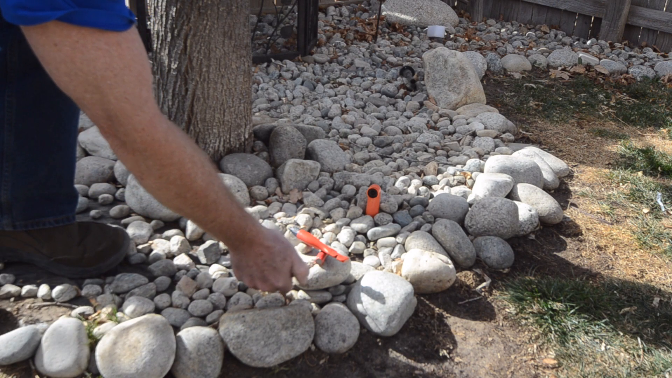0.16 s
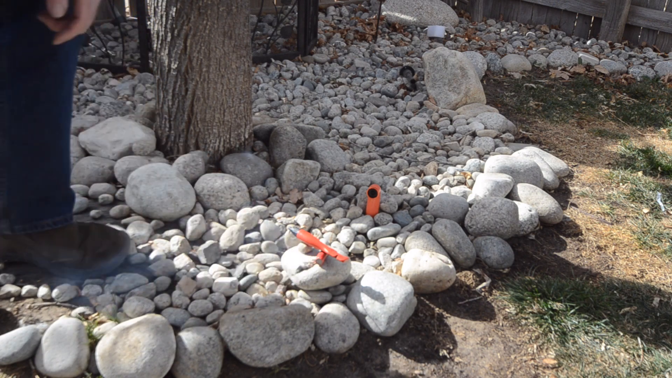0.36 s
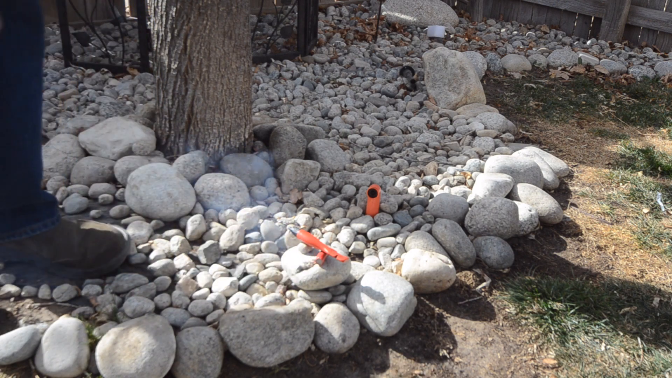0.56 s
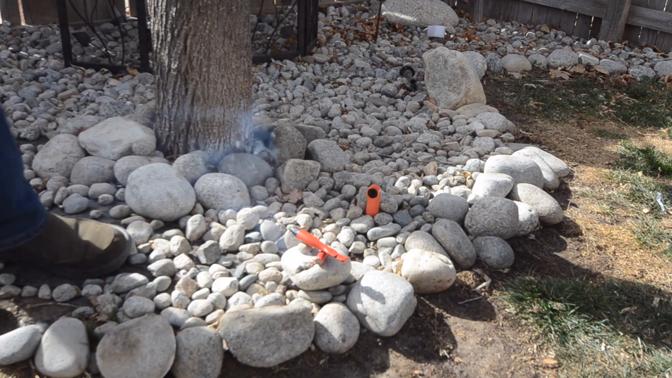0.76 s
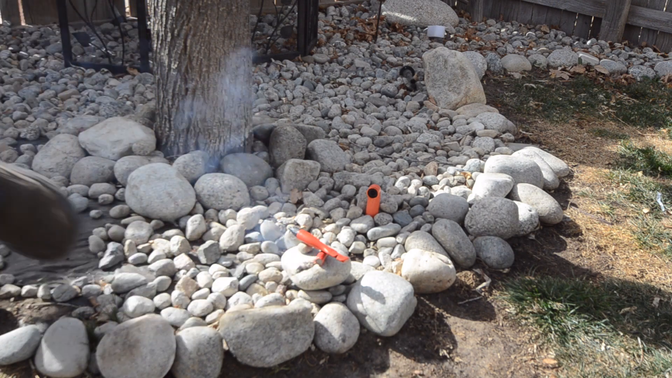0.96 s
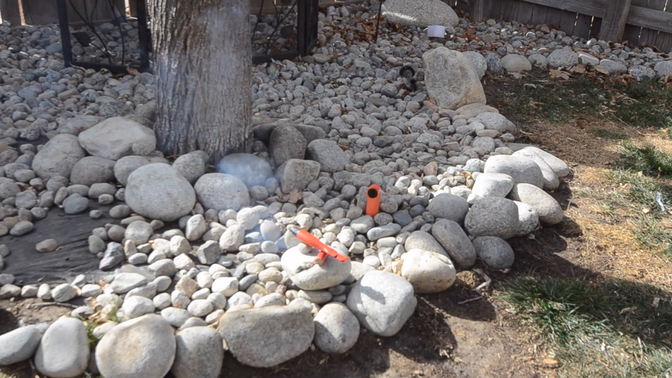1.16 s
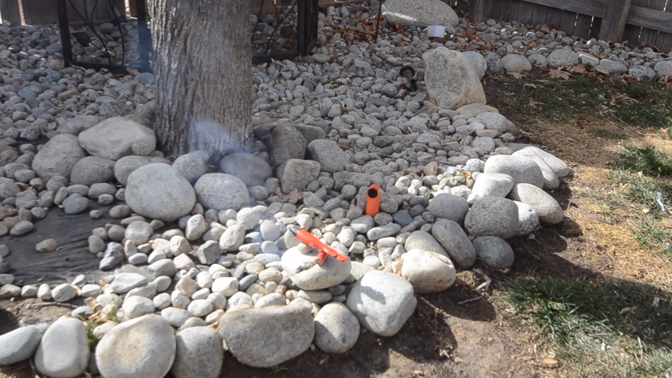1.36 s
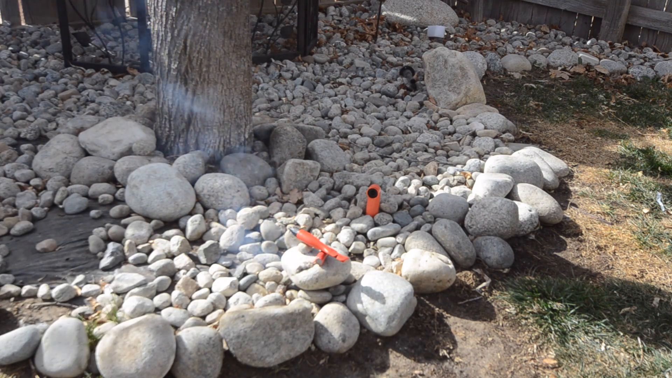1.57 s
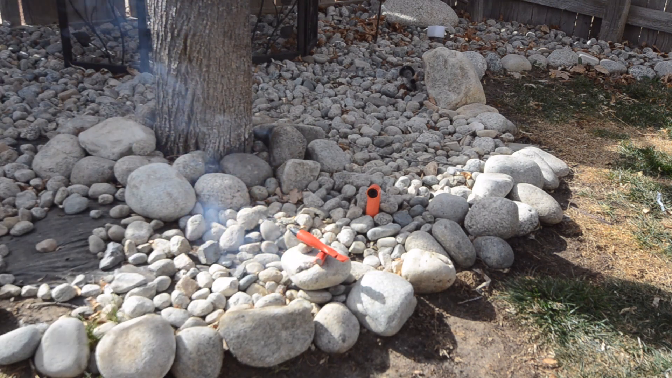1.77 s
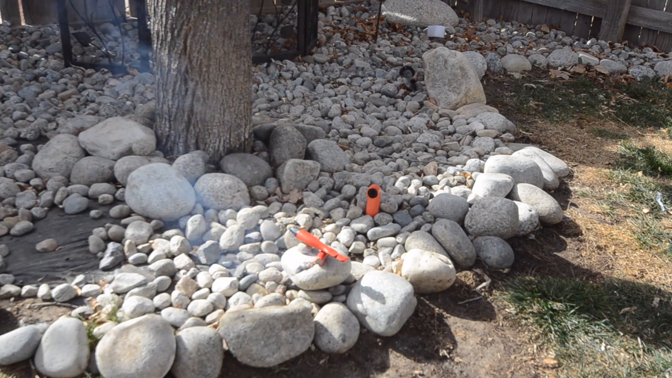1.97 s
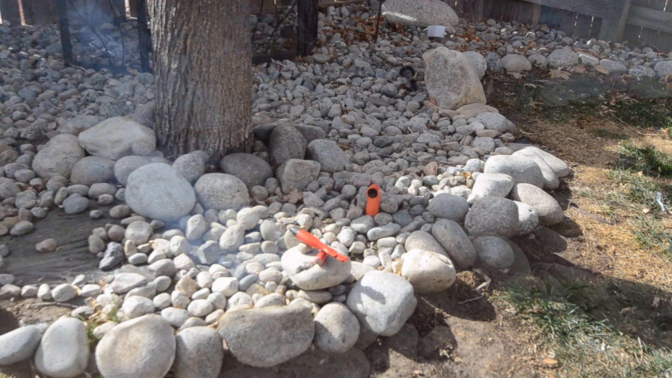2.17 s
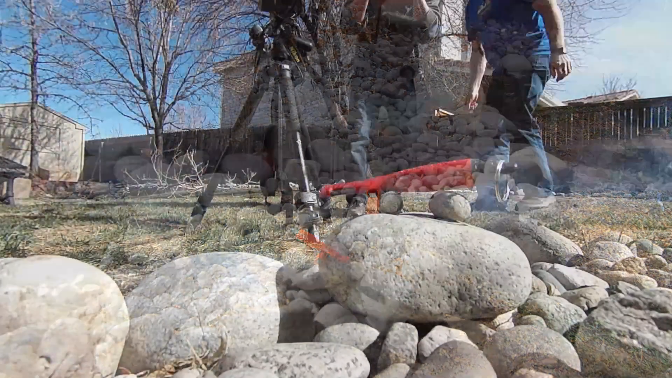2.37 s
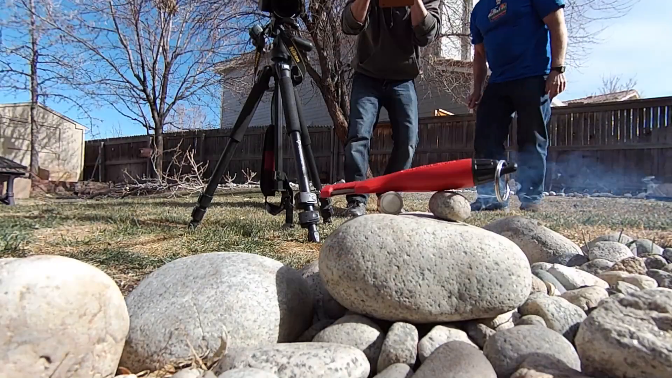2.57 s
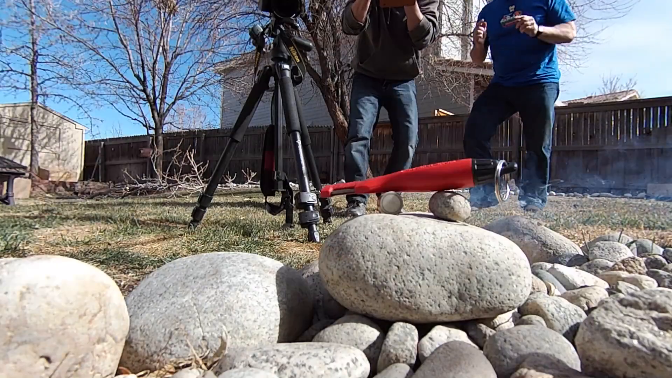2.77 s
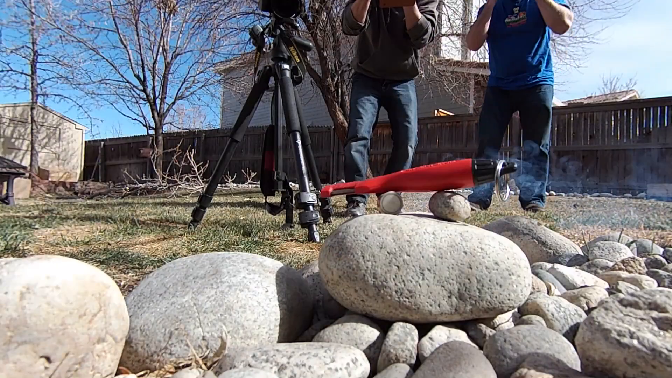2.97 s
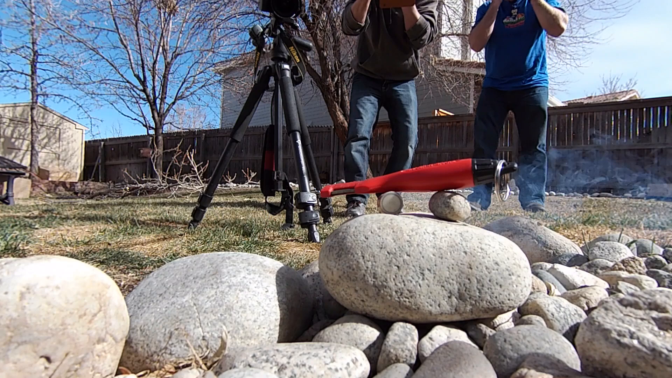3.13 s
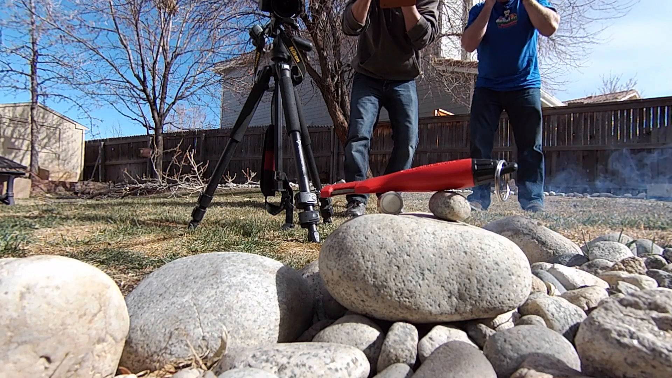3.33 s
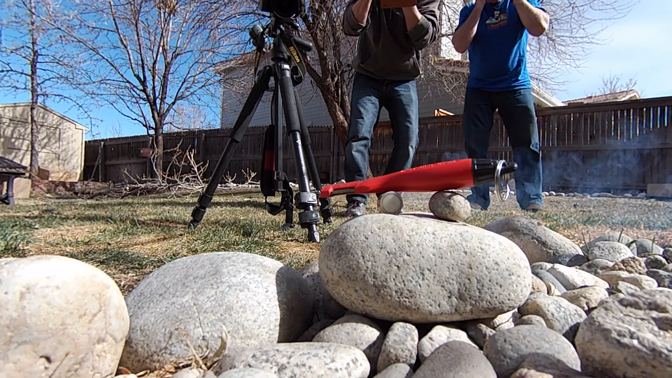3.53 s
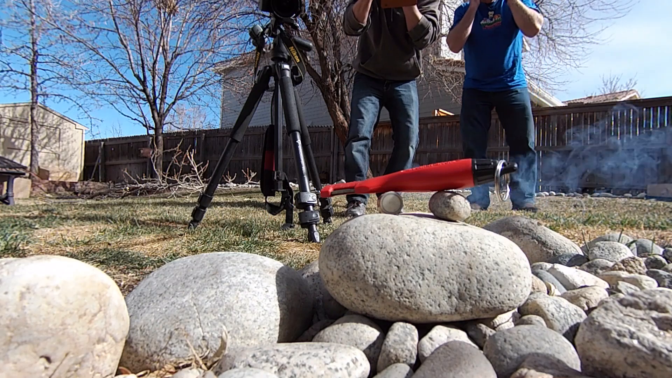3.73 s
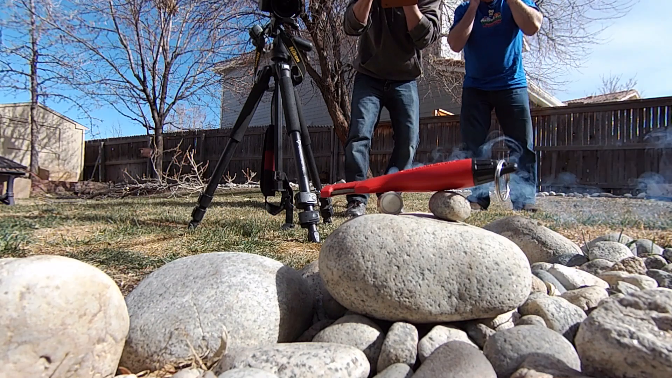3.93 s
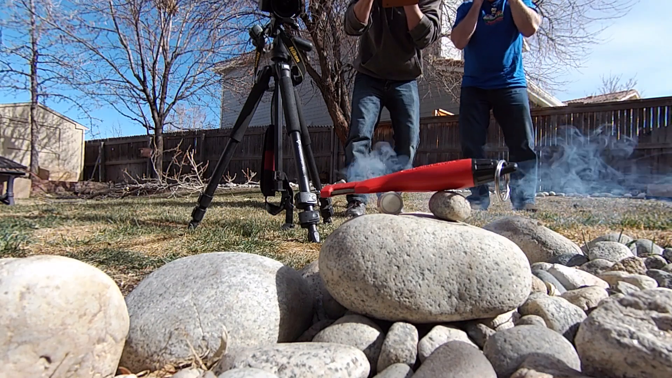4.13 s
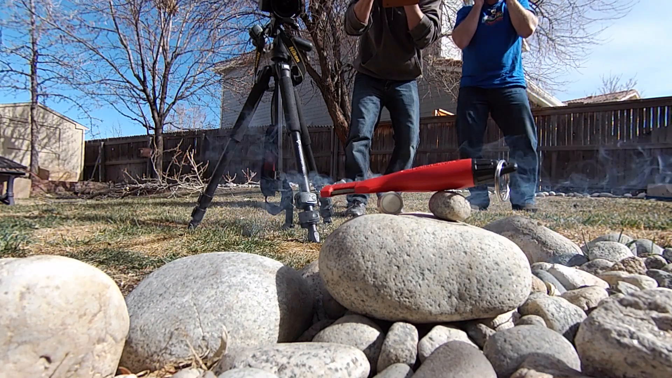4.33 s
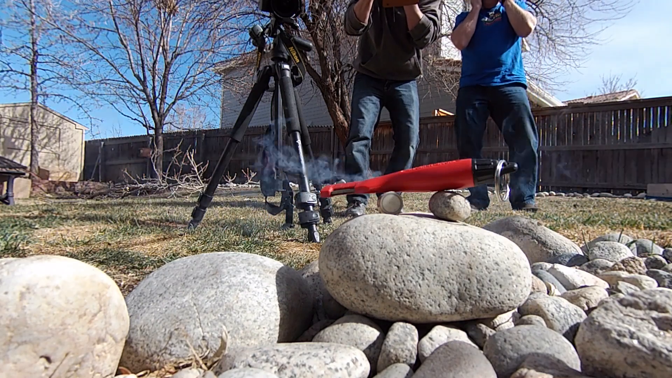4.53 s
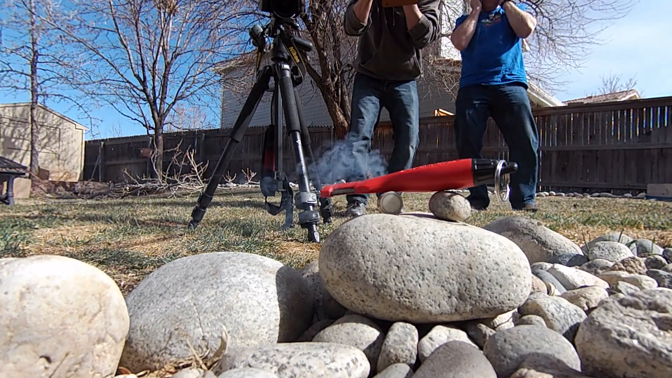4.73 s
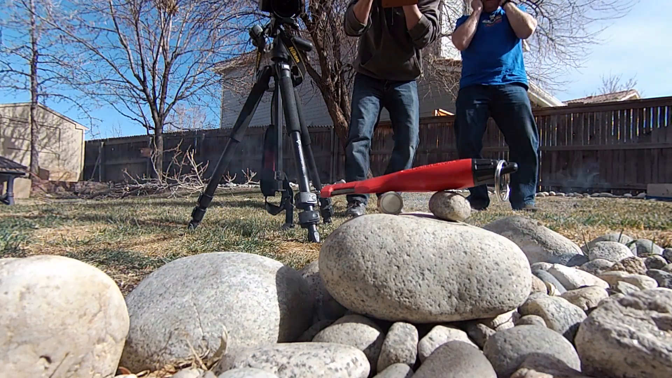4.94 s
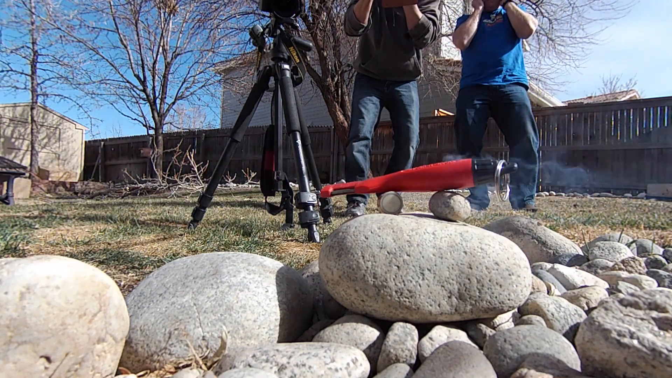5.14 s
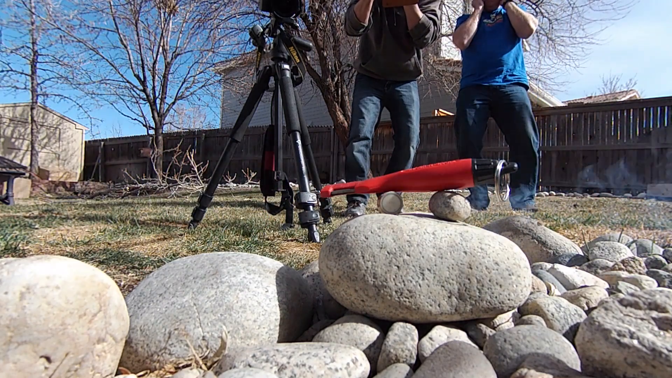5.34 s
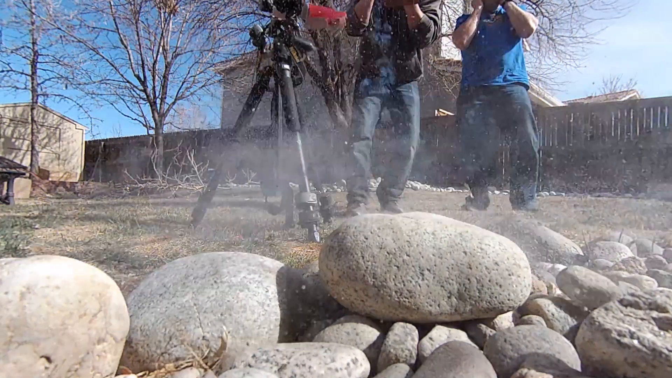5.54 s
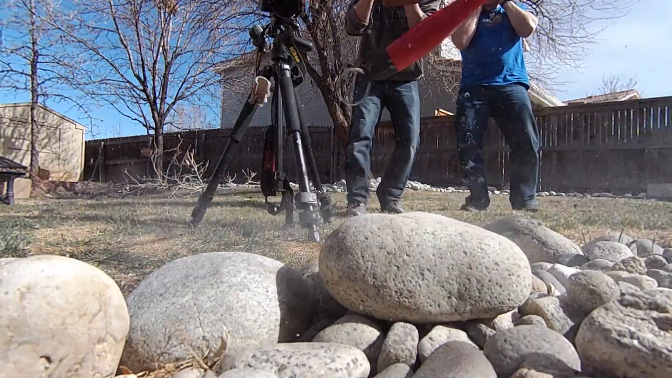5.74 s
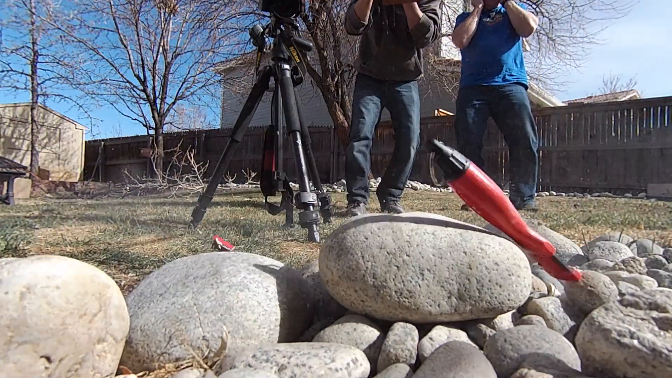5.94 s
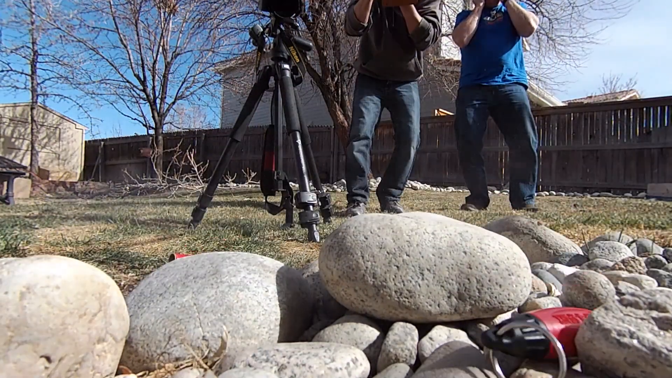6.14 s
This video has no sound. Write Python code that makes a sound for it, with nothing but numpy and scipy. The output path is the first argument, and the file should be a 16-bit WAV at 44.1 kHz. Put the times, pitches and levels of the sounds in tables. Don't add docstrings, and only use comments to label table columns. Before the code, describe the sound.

From the start a lit fuse hisses close to the microphone in an open garden, loudest at first, then settling within half a second into a steady, airy, fluttering jet over faint wind rumble. Tiny spits and pebble ticks dot it around 1 to 1.6 seconds, with a sharper pop at 2.0. It flares brighter near 2.8, then from 3.1 creeps into a plastic tube; by 3.75 the top is gone and the hiss is nasal, with sizzling puffs from 4 onward. Low wind thumps multiply after 4.1. At about 5.0 everything abruptly drops quieter. At 5.42 a huge bang overloads the microphone, with dense roaring reflections collapsing by 5.55 into dull yard echo. A faint rising whoosh follows near 5.7, then scraps click and crunch on stones from 5.73, strongest at 5.83 and 6.11, with hollow plastic knocks, ending in faint murmur and wind.

```python
import sys
import numpy as np
from scipy import signal
from scipy.io import wavfile

SR = 44100
rng = np.random.default_rng(int(sys.argv[2]) if len(sys.argv) > 2 else 0)


def gain_from_db(level_db):
    decades = np.asarray(level_db, float) / 20
    return 10 ** decades


def output_pcm(signal):
    pcm = np.clip(np.atleast_2d(signal).T, -1, 1) * 32767
    wavfile.write(sys.argv[1], SR, np.round(pcm).astype(np.int16))


N = 277830
STEP = 40
SHOCK_S = 5.4242


def clock():
    return np.arange(N) / SR


def rms_one(x):
    return x / np.sqrt(np.mean(x ** 2) + 1e-20)


def band_pass(x, low_hz, high_hz):
    return signal.sosfilt(signal.butter(2, [low_hz, high_hz], "band", fs=SR, output="sos"), x)


def in_time(rows):
    s, *columns = np.transpose(rows)
    return [np.interp(clock(), s, c) for c in columns]


def at_hz(points, hz):
    points = np.array(points)
    return np.interp(np.log(hz), np.log(points[:, 0]), points[:, 1])


def spread(slow):
    return np.interp(np.arange(N) / STEP, np.arange(len(slow)), slow)


def slow_drift(rate_hz):
    r = np.exp(-2 * STEP * np.pi * rate_hz / SR)
    settle = 2000
    chance = rng.standard_normal(N // STEP + settle + 2)
    smooth = signal.lfilter([1], [1, -2 * r, r * r], chance)
    return rms_one(smooth[settle:])[:-(-N // STEP)]


def drift(rate_hz):
    return spread(slow_drift(rate_hz))


def ring(clicks, hz, t60):
    r, w = gain_from_db(-60 / (t60 * SR)), 2 * np.pi * hz / SR
    return signal.lfilter([0, np.sin(w)], [1, -2 * r * np.cos(w), r * r], clicks + 1e-18)


def cut(x, hz, width_hz, db):
    w, a, g = 2 * np.pi * hz / SR, np.tan(np.pi * width_hz / SR), gain_from_db(db / 2)
    zeros = [1 + a * g, -2 * np.cos(w), 1 - a * g]
    poles = [1 + a / g, -2 * np.cos(w), 1 - a / g]
    return signal.lfilter(zeros, poles, x)


def flatten(x, top, knee):
    return x / (1 + np.abs(x / top) ** knee) ** (1 / knee)


def blended_noise(first, second, share, span, flicker_db, tilt_db=0, flutter_db=0, count=3):
    edges = np.geomspace(*span, round(count * np.log2(span[1] / span[0])) + 1)
    white, out, power = rng.standard_normal((2, N)), 0, 0
    share, tilt_db, flutter_db = [(v + np.zeros(N))[::STEP] for v in (share, tilt_db, flutter_db)]
    for k, (low, high) in enumerate(zip(edges, edges[1:])):
        hz = np.sqrt(low * high)
        band = band_pass(white[k % 2], low, high)
        colour_db = (1.5 - share) * at_hz(first, hz) + share * at_hz(second, hz)
        gain = gain_from_db(colour_db + tilt_db * np.log2(max(hz, 2800.) / 2800.))
        power = power + gain ** 2 * (high - low)
        grip = np.clip(np.log2(hz / 700) / 3, 0, 1)
        out = out + band * spread(gain * gain_from_db(flicker_db * slow_drift(24) + flutter_db * grip))
    return out / spread(np.sqrt(power * 3.08 / SR))


def gain_step_db():
    return -11.5 * (clock() > 4.984)


# time in seconds, hiss in dB, heat of the flame in dB.
BURN = [(0.0, -26, -4), (0.05, -26.5, -6.5), (0.25, -32.5, -0.5), (0.48, -34, -2.5), (2.0, -34, -0.5),
        (2.6, -34, 0.5), (2.83, -32.5, 3.5), (3.12, -34.5, -4.5), (3.38, -35, -3), (3.7, -36.8, -6),
        (3.73, -36.5, -14), (3.81, -33.5, -12), (4.02, -32.5, -10.5), (4.45, -36, -10.5), (4.83, -34, -5),
        (5.05, -34.5, -6), (5.33, -33.5, -2)]
# centre in seconds, strength in dB, half length in seconds.
PUFFS = [(3.98, 3, .03), (4.15, 11, .09), (4.26, 8, .045), (4.38, 10.5, .07), (4.655, 9.5, .19),
         (4.96, 9, .11), (5.152, 12, .012), (5.284, 7, .07), (5.39, 10.5, .06)]
SHADOW_S = 3.74


def flame(inside):
    t, (hiss_db, heat_db) = clock(), in_time(BURN)
    puff_db = sum(db * np.clip(1 - np.abs(t - s) / half_s, 0, 1) for s, db, half_s in PUFFS)
    open_db, hidden_db = -8.5 - 11 * inside, -28.5
    gone = np.clip((t - SHADOW_S + .04) / .12, 0, 1)
    sizzle_db = (1 - gone) * open_db + gone * hidden_db + puff_db
    return hiss_db + .25 * puff_db + gain_step_db(), heat_db + .55 * puff_db, sizzle_db


# time in seconds, share from 0 to 1.
INSIDE = [(0, 0.07), (2.9, 0.01), (3.3, 0.42), (3.7, .7), (4.0, 0.66), (5.4, 1)]
# frequency in Hz, level in dB per Hz.
OPEN_JET = [(88, -31), (150, -2), (729, -2), (1170, 0), (1790, -5), (2290, -3.5), (3740, -7.5), (4080, -6),
            (4780, -7), (6560, -3), (10000, -5.5), (13000, -37), (22000, -120)]
TUBE_JET = [(180, -38), (300, -29.5), (396, -17.5), (1190, -10), (1420, -4.5), (1670, -25.5), (2170, -1),
            (2710, 4), (3630, -4), (6530, -4.5), (10000, -17.5), (13000, -50), (22000, -120)]
# frequency in Hz, level in dB per Hz.
OPEN_SIZZLE = [(9500, -1), (11300, -2), (13200, -7.5), (16000, -11)]
TUBE_SIZZLE = [(9500, 12), (11300, -4), (13200, -13), (16000, -25.5)]
# frequency in Hz, width in Hz, depth in dB.
GROUND = [(3100, 123, -12), (3703, 86, -14.5), (4740, 490, -4.5), (7150, 150, -8), (9670, 250, -6),
          (10170, 690, -7), (14000, 260, 4.5)]
# frequency in Hz, width in Hz, depth in dB.
FIRST_DIP = (1900, 370, -18)
LAST_DIP = (1624, 510, -15.5)
# time in seconds, delay in ms, level in dB.
HAND = [(0, .15, -13), (.1, .165, -9), (.2, .33, -9), (.28, .45, -17), (.4, .6, -40), (.5, .6, -60)]


def fuse():
    inside = in_time(INSIDE)[0]
    hiss_db, heat_db, sizzle_db = flame(inside)
    hidden = np.clip((clock() - SHADOW_S) / .3, 0, 1)
    hidden = hidden - 0.33 * inside * (1 - hidden)
    spits = (rng.random(N) < 70 / SR) * rng.random(N)
    spit_db = 3 * signal.lfilter([1], [1, -gain_from_db(-60 / (.04 * SR))], spits)
    flutter_db = spit_db + .8 * drift(25) + 1.3 * drift(140) + 1.1 * inside * drift(18)
    tilt_db = 0.68 * (heat_db + 1.5 + 1.2 * inside)
    jet = blended_noise(OPEN_JET, TUBE_JET, inside, (130, 9500), 0.83, tilt_db, flutter_db)
    sizzle = blended_noise(OPEN_SIZZLE, TUBE_SIZZLE, hidden, (9500, 16500), .8, 0, flutter_db, count=8)
    jet = jet + gain_from_db(sizzle_db + 2.0) * sizzle
    for hz, width_hz, db in GROUND:
        jet = cut(jet, hz, width_hz, db)
    travel = np.sqrt(np.arange(N) / N)
    jet = (1 - travel) * cut(jet, *FIRST_DIP) + travel * cut(jet, *LAST_DIP)
    delay_ms, hand_db = in_time(HAND)
    jet = jet + gain_from_db(hand_db) * np.interp(np.arange(N) - delay_ms * SR / 1000, np.arange(N), jet)
    return jet * gain_from_db(hiss_db + 2.27) * (clock() < SHOCK_S)


# time in seconds, rumble in dB.
WIND = [(0.0, -41), (0.47, -38), (1.2, -42.5), (3.37, -40), (3.9, -41), (4.26, -37), (4.74, -35),
        (4.84, -40), (4.98, -28), (4.995, -41), (5.2, -29), (5.34, -34), (5.39, -23), (5.56, -44),
        (5.676, -37), (5.78, -44), (6.3, -36)]
# frequency in Hz, level in dB per Hz.
RUMBLE = [(12, -44), (20, -19.5), (34, -3.5), (59, -0.5), (109, -1.5), (147, -7), (300, -9.5), (390, -59.5),
          (660, -120)]
YARD = [(12, -41), (20, -10), (107, -8.5), (182, -6), (220, -22), (615, -29), (1200, -58), (1560, -88),
        (2640, -120)]
# start in seconds, peak in dB, frequency in Hz, t60 in seconds.
BUFFETS = [(4.108, -24.5, 51.1, 0.037), (4.331, -18, 91.5, 0.077), (4.405, -29, 111, 0.074),
           (4.429, -20, 61.9, 0.049), (4.51, -25, 56.5, 0.11), (4.541, -25.5, 51.1, 0.078),
           (4.648, -15.5, 96, 0.03), (4.808, -25, 88.8, 0.055), (4.859, -29.5, 137, 0.13),
           (4.932, -24, 76, 0.09), (4.959, -22.5, 95.5, 0.14), (5.11, -31.5, 62.5, 0.17),
           (5.178, -38, 156, 0.095), (5.198, -29, 86.1, 0.11), (5.237, -19.5, 80.7, 0.037),
           (5.318, -28, 142, 0.087), (5.337, -21, 95, 0.051), (5.396, -25.5, 159, 0.06),
           (5.404, -20, 51.1, 0.1), (6.021, -36, 51.7, 0.065), (6.053, -20.5, 91, 0.02),
           (6.196, -35, 70.0, 0.06), (6.253, -29, 110, 0.051), (6.275, -42, 64.6, 0.049)]


def wind():
    after = clock() > SHOCK_S
    rumble = blended_noise(RUMBLE, YARD, after, (18, 1300), 1.7, count=2)
    rumble = rumble * gain_from_db(in_time(WIND)[0] + gain_step_db() - 1.5)
    t = np.arange(round(.12 * SR)) / SR
    for s, peak_db, hz, t60 in BUFFETS:
        i = round(s * SR)
        turns = hz * (t + 0.0023 * (1 - np.exp(-t / 0.0051)))
        fade = gain_from_db(peak_db + 3 - 60 * t / max(t60, .01)) * (1 - np.exp(-t / .001))
        thump = np.sin(2 * np.pi * turns) * fade
        rumble[i:i + len(t)] += thump[:N - i]
    return rumble


def self_noise():
    return gain_from_db(-79) * rms_one(band_pass(rng.standard_normal(N), 9000, 12500))


# time in seconds, peak in dB.
SPARKS = [(1.0182, -21), (1.4068, -22), (1.4916, -21), (1.5789, -22), (2.001, -11.5), (2.6914, -24),
          (2.9473, -16), (3.0356, -17), (3.4557, -17), (3.9201, -30), (3.972, -25), (4.5611, -27),
          (4.6115, -20), (5.3863, -22)]


def sparks():
    clicks = np.zeros(N)
    clicks[[round(s * SR) for s, db in SPARKS]] = gain_from_db(np.array(SPARKS)[:, 1] - 0.5)
    return band_pass(clicks + 1e-18, 4000, 11000)


# time in seconds, peak in dB, frequency in Hz.
POPS = [
    (1.166, -39, 1780),
    (1.402, -35, 4150),
    (1.578, -39, 4600),
]


def pops():
    return sum(ring(gain_from_db(db) * (np.arange(N) == round(s * SR)), hz, .03) for s, db, hz in POPS)


def blast_level(t):
    flare_s = 5.4045
    flare = gain_from_db(-30 + 380 * (np.minimum(t, SHOCK_S) - flare_s) - 12 * (t < flare_s))
    crest_s = 5.455
    crest = gain_from_db(2.5 - 9000 * np.where(t < crest_s, .4, 1) * (t - crest_s) ** 2)
    near = gain_from_db(-24.5 - 2100 * (t - 5.5) ** 2)
    far = gain_from_db(-45.5 - 30 * np.maximum(t - SHOCK_S, 0))
    return np.where(t < SHOCK_S, flare, np.sqrt(crest ** 2 + near ** 2 + far ** 2))


# frequency in Hz, level in dB per Hz.
FRONT = [(30, -12), (60, 1), (200, -3), (500, -4), (1400, -7.5), (3000, -6), (6000, -3.5), (9000, -7.5),
         (16000, -11.5)]
ECHO = [(30, -24), (100, -13.5), (300, -4.5), (700, -7), (1200, -15.5), (2000, -11.5), (4000, -16),
        (6200, -10.5), (8000, -21.5), (11000, -19), (16000, -39)]
# start in seconds, level in dB, swing in Hz, t60 in seconds.
PUSHES = [
    (5.4242, 3, 18, .04),
    (5.4545, 3, 40, .024),
    (5.4672, 3, 500, .028),
    (5.474, -4, 195, .06),
    (5.4845, -5, 300, .03),
    (5.4965, -9, 300, .02),
]


def bang():
    t = clock()
    late = np.clip((t - 5.45) / .05, 0, 1)
    roar = blended_noise(FRONT, ECHO, late, (30, 16500), 1) * blast_level(t)
    out = np.where(t < SHOCK_S - .005, band_pass(roar, 3500, 14000), roar)
    for s, db, hz, t60 in PUSHES:
        since = np.maximum(t - s, 0)
        out = out + (t > s) * np.cos(2 * np.pi * hz * since) * gain_from_db(db - 60 * since / t60)
    return out


# centre in seconds, level in dB.
MURMUR = [
    (6.028, -54),
    (6.06, -48),
    (6.192, -57),
    (6.254, -59),
]


def murmur():
    noise = band_pass(rng.standard_normal(N), 200, 620)
    t, holds_s = clock(), 5.81
    level = gain_from_db(-54 + (t > holds_s) * (-7 - 30 * (t - holds_s)))
    level = level + sum(gain_from_db(db) * np.exp(-np.abs(t - s) / .012) for s, db in MURMUR)
    return rms_one(noise) * level * gain_from_db(-3.5 + 2.2 * drift(20)) * (t > SHOCK_S)


# time in seconds, centre in Hz, level in dB.
WHOOSH = [(5.6, 178.7, -78), (5.67, 218.2, -54), (5.72, 423, -55), (5.755, 522, -55), (5.79, 797, -71),
          (5.83, 900, -80)]


def whoosh():
    hz, db = in_time(WHOOSH)
    wobble = signal.sosfilt(signal.butter(2, 130, fs=SR, output="sos"), rng.standard_normal((2, N)))
    turn = 2 * np.pi * np.cumsum(hz) / SR
    air = rms_one(wobble[0] * np.cos(turn) + wobble[1] * np.sin(turn))
    return gain_from_db(db) * air * (clock() > SHOCK_S)


# start in seconds, peak in dB, ring in Hz, scatter in dB re peak.
DEBRIS = [(5.7269, -34, 9300, -13), (5.7821, -22.5, 7340, -6), (5.7837, -30, 4600, -8),
          (5.7964, -35, 7280, -4), (5.8024, -43, 5760, -10), (5.8287, -14, 7200, -21.5),
          (5.8354, -34, 4540, -10), (5.8425, -37, 7020, -10), (5.8596, -26, 4650, -19),
          (5.8674, -36, 4500, -10), (5.883, -49, 7200, -5), (5.896, -31, 5050, -16),
          (5.914, -39, 7800, -21), (5.931, -29, 4470, -22), (5.9363, -28.5, 7800, -11),
          (5.9454, -34, 7000, -10), (5.9647, -40, 5180, -8.5), (5.9874, -59, 4910, -12),
          (6.0534, -50, 9900, -8), (6.0621, -44, 7320, -10), (6.0713, -21.5, 6950, -6.5),
          (6.0745, -31, 5230, -5), (6.1, -24, 6100, -14), (6.114, -7.5, 5260, -24), (6.1293, -32, 5590, -5),
          (6.131, -26, 5050, -16), (6.137, -31, 5600, -14), (6.1589, -36, 6000, -10),
          (6.2754, -50, 10500, -13), (6.2954, -49, 6300, -4.5)]


def debris():
    out = np.zeros(N)
    t = np.arange(round(.07 * SR)) / SR
    shape = (len(DEBRIS), len(t))
    crunch = band_pass(rng.standard_normal(shape) * rng.exponential(1, shape), 3200, 15000)
    uppers_hz = rng.uniform(8200, 11000, len(DEBRIS))
    for (s, peak_db, hz, grit_db), upper_hz, noise in zip(DEBRIS, uppers_hz, crunch):
        i = round(s * SR)
        upper = gain_from_db(-7 + .35 * grit_db)
        rings = 0.7 * np.sin(2 * np.pi * hz * t) + 0.44 * upper * np.sin(2 * np.pi * upper_hz * t)
        rings = rings * gain_from_db(-60 * t / 0.01) * (1 - np.exp(-t / 0.0002)) ** 2
        crack = 0.7 * upper * noise * gain_from_db(-60 * t / 0.0043)
        grit = ring(noise, hz, .0015) + 3.7 * upper * ring(noise, upper_hz, 0.0018)
        grit = rms_one(grit + .5 * noise + 2.6 * upper * np.diff(noise, prepend=0))
        hit = rings + crack + gain_from_db(grit_db - 60 * t / .027) * grit
        out[i:i + len(t)] += gain_from_db(peak_db) * hit[:N - i]
    return out


# time in seconds, level of the mode pair in dB,
# turn of the tube from 0 to 1, top mode in dB re the pair.
KNOCKS = [(5.781, -48, .35, -8), (5.828, -50, .3, -4), (5.861, -40, .5, -9), (5.897, -42, .06, -2.5),
          (5.929, -48.5, .78, -4.5), (5.949, -55.5, .24, -10.5), (5.967, -56, .27, -5),
          (6.01, -61, .13, -7), (6.07, -33, .05, -7), (6.101, -51.5, .36, 3.5), (6.114, -33, .13, 9),
          (6.128, -34.5, .62, -9), (6.159, -53.5, .46, 4.5)]
# frequency in Hz, t60 in seconds.
TUBE = [
    (860, 0.057),
    (1635, 0.04),
    (1880, 0.026),
    (3535, 0.027),
]


def tube():
    s, db, turn, top_db = np.transpose(KNOCKS)
    low_db = -19 + 18 * (s == s.min())
    strengths = [gain_from_db(low_db), np.cos(turn * np.pi / 2), np.sin(turn * np.pi / 2), gain_from_db(top_db)]
    out = np.zeros(N)
    for (hz, t60), strength in zip(TUBE, strengths):
        clicks = np.zeros(N)
        clicks[(s * SR).astype(int)] = gain_from_db(db + 4.5) * strength
        out += ring(clicks, hz, t60)
    return band_pass(out, 700, 5000)


def scene():
    burning = fuse() + wind() + self_noise() + sparks() + pops()
    blast = bang() + murmur() + whoosh() + debris() + tube()
    return (burning + blast)[None]


def roll_off(x):
    return signal.sosfilt(signal.butter(12, 16500, fs=SR, output="sos"), x)


def record(dry):
    overloaded = flatten(dry, .48, 4.5)
    cut_top = signal.sosfilt(signal.ellip(12, .3, 62, 15720, fs=SR, output="sos"), overloaded)
    return roll_off(flatten(cut_top, .66, 8))


dry = scene()
out = record(dry)
output_pcm(out)
```